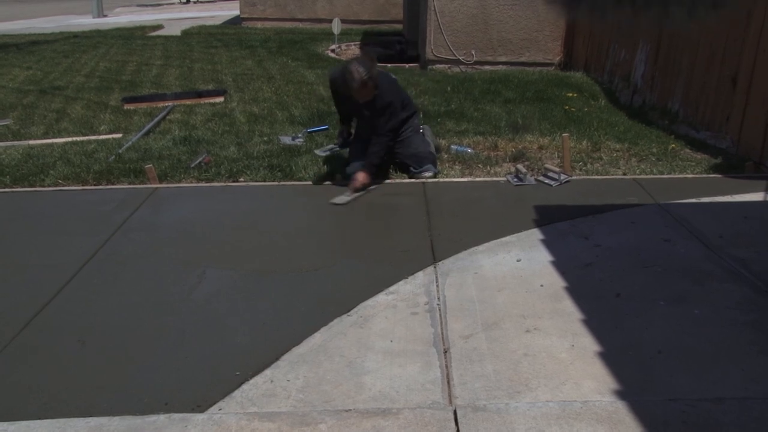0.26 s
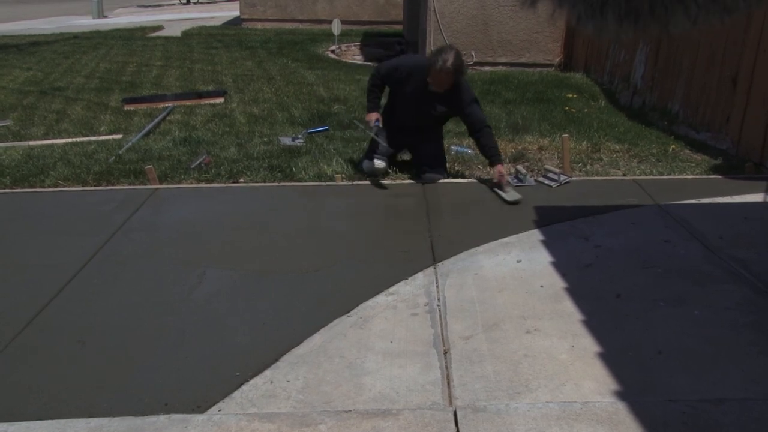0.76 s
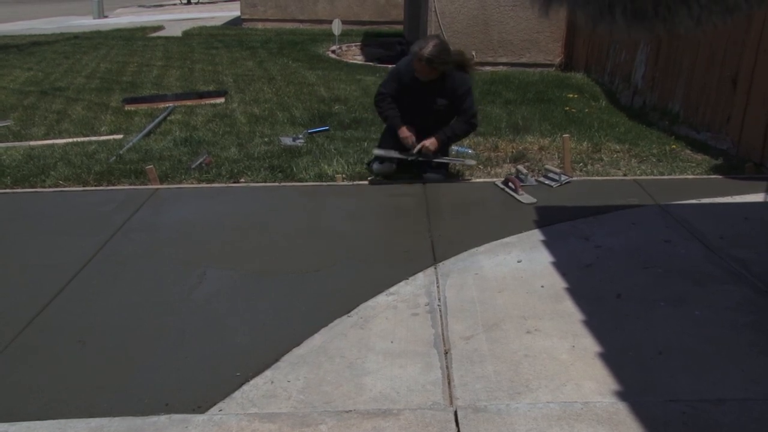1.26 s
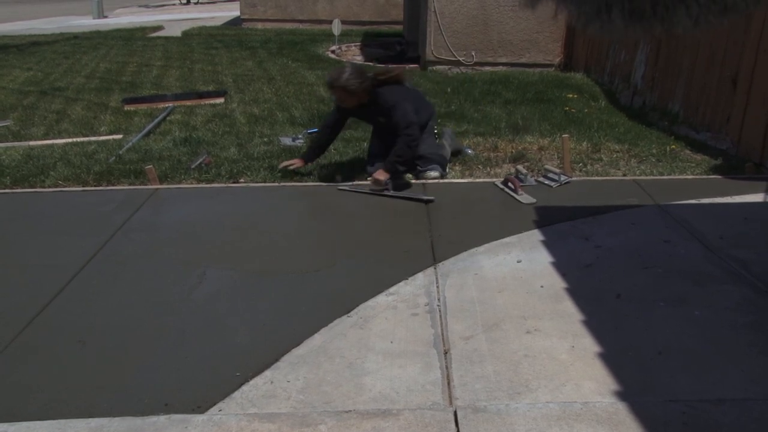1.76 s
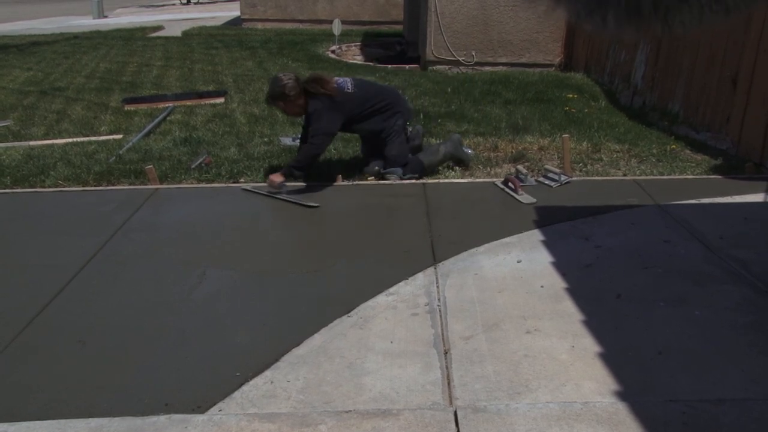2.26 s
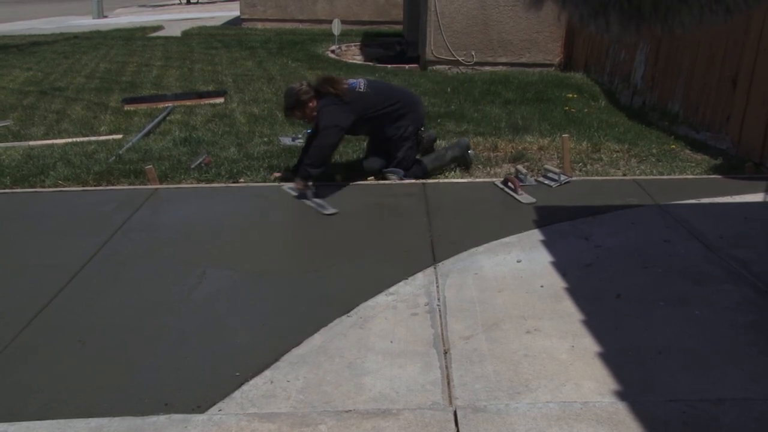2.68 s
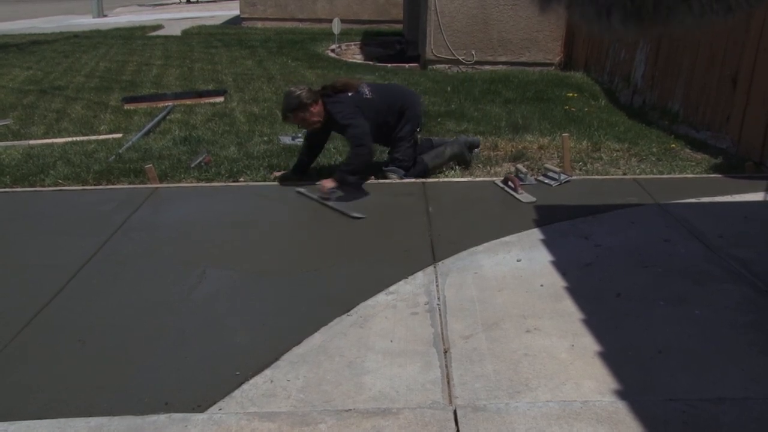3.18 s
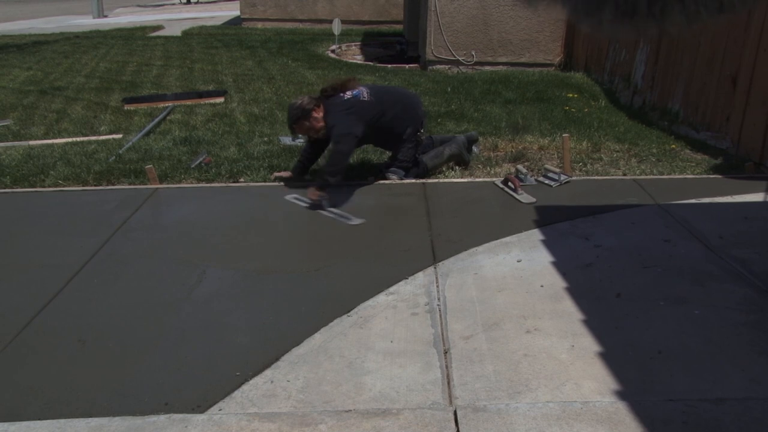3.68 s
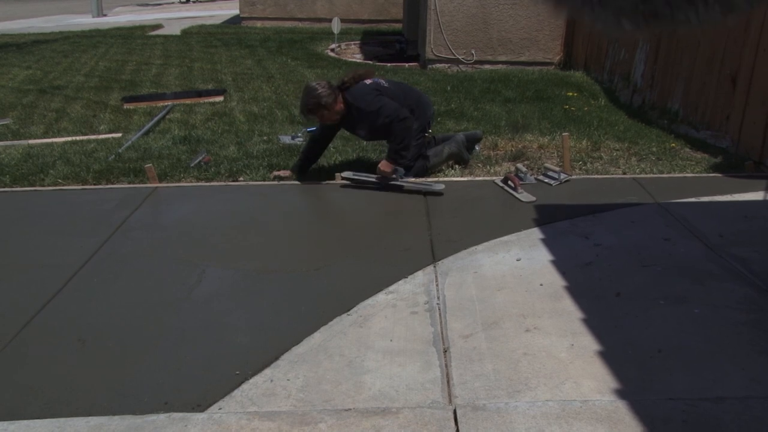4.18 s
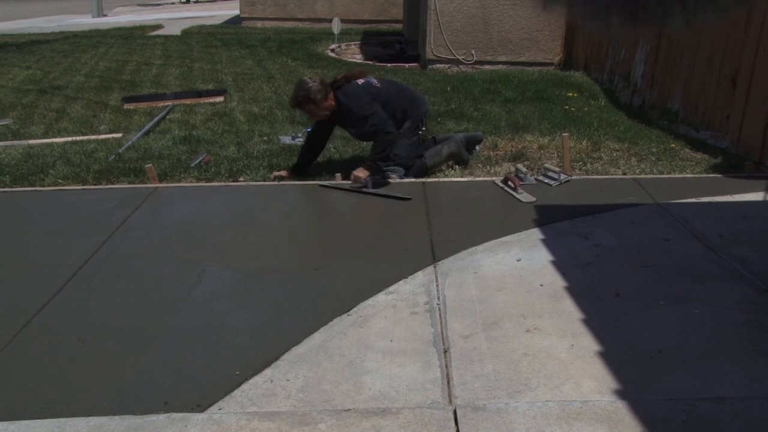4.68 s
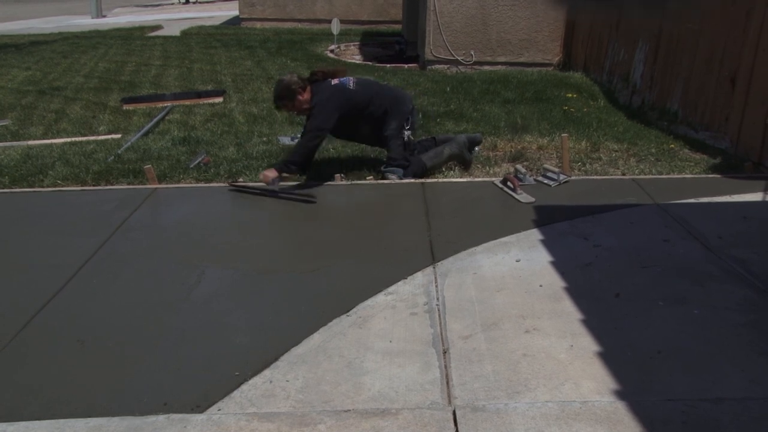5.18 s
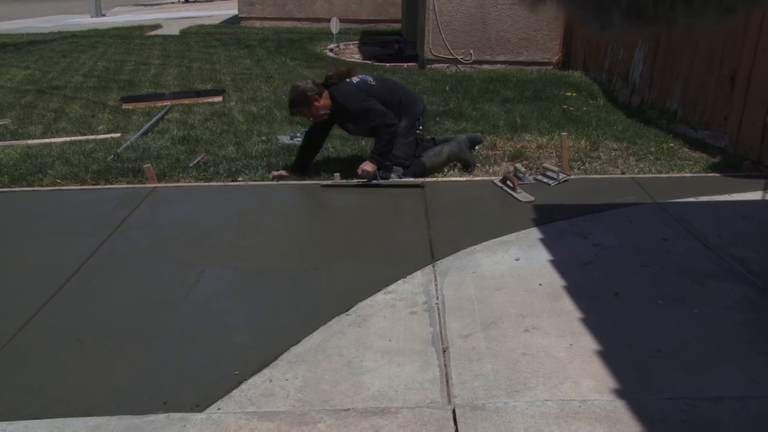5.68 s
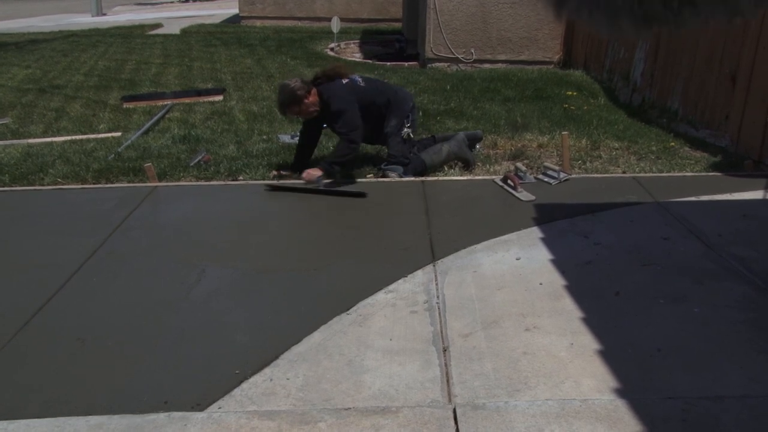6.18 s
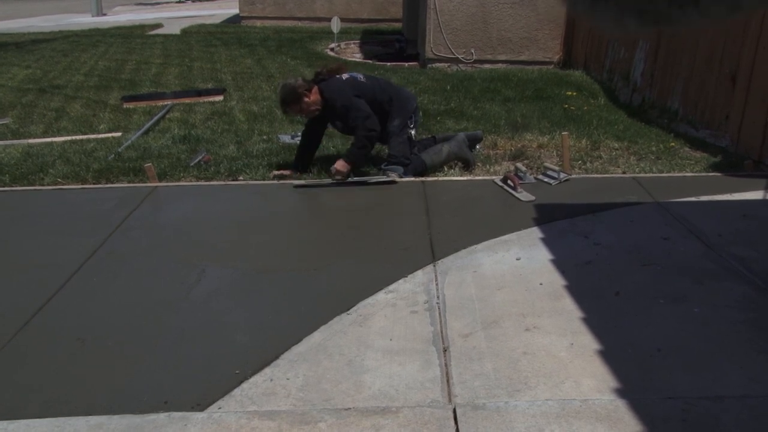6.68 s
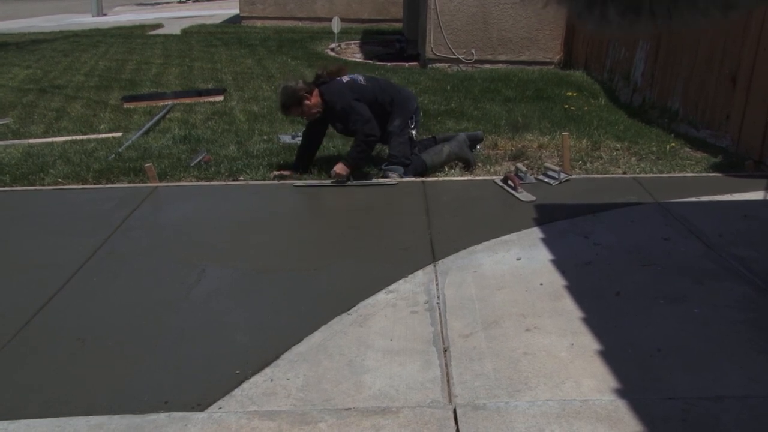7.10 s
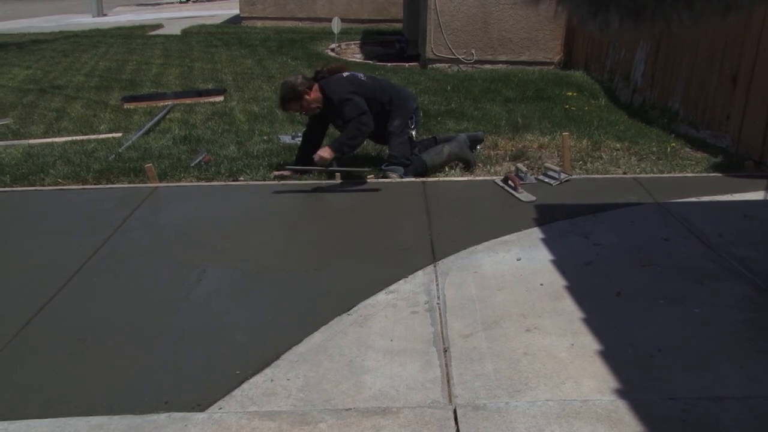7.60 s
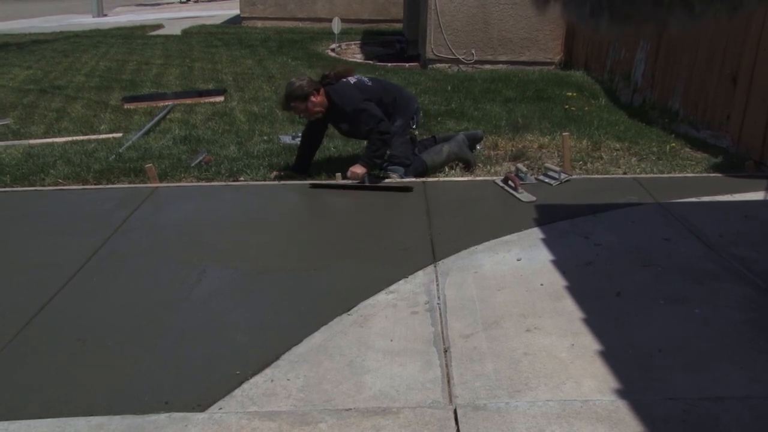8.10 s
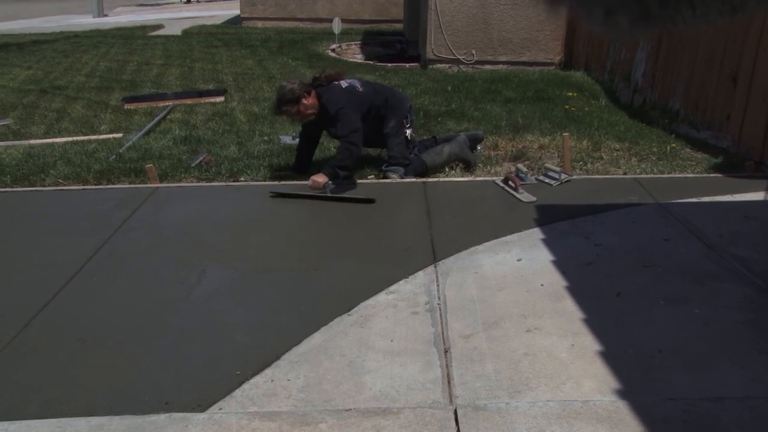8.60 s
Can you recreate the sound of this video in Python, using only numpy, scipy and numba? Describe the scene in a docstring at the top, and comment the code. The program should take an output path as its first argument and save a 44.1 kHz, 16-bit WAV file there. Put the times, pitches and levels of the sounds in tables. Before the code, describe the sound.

A steel trowel works wet concrete in an open yard, almost entirely in the left channel, over a faint low neighbourhood rumble and slight hiss. From 0 to 0.5 s two light sandy strokes rasp, the second ending in a small bite. Around 0.9 s a dull bump and gritty clicks, then near quiet until bumps and metallic taps at 1.75-1.85 s. From 1.85 to 4.1 s the strokes run on, bright and hissing, with sharp grain ticks; a low hollow knock rings briefly at 3.05 s. Another scrape spans 4.5-5.3 s beneath heavy wind thuds on the microphone, strongest near 5 s. A faint blade ring at 5.83 s starts a rougher, louder stroke until 6.35 s, with snaps and weaker gusts. A lighter scrape comes at 7.2-7.5 s, a tiny far bird whistle at 7.8 s, then two strong, growling strokes from 8.06 to 8.85 s, with a short dull outdoor tail.

```python
"""A steel trowel sweeps in short arcs over wet concrete: stick-slip of sand grains gives resonant noise.
The wet paste adds a smoother hiss, coarse grains snap, and the blade's modes ring when it is set down or lifted.
Gusts thud on the microphone as slow pressure noise with higher eddies, over a faint far rumble of filtered noise.
Dull noise bumps, one low ringing knock and a short whistle of a far bird are added; a faint tail follows the trowel.
Nearly all the sound is in the left channel."""
import sys
import numpy as np
from scipy import signal
from scipy.fft import rfft, irfft
from scipy.io import wavfile
from scipy.ndimage import uniform_filter1d
from numba import njit

SR = 44100
rng = np.random.default_rng(int(sys.argv[2]) if len(sys.argv) > 2 else 0)


def waveform_to_disk(signal):
    """Save audio, clipped to [-1, 1], as 16-bit WAV at the path in sys.argv[1]."""
    frames = np.transpose(np.atleast_2d(signal))
    scaled = np.clip(frames, -1, 1) * 32767
    samples = np.round(scaled).astype(np.int16)
    wavfile.write(sys.argv[1], SR, samples)


N = 389799
TIME = np.arange(N) / SR   # s

# spectrum of the rasp of sand: (frequency [Hz], relative density [dB per Hz])
RASP_SPECTRUM = [(400, -48.5), (1000, -27), (1700, 2.5), (2300, 1.5), (3350, 5.5), (4000, -1.5),
                 (4800, -11.5), (8000, -47.5)]
# spectrum of the growl of the edge: (frequency [Hz], relative density [dB per Hz])
GROWL_SPECTRUM = [(200, -26.5), (450, -13.5), (850, -4), (1500, 4.5), (2100, -7), (3000, -35.5)]
# spectrum of the hiss of wet paste: (frequency [Hz], relative density [dB per Hz])
HISS_SPECTRUM = [(1200, -15.5), (3800, 3.5), (5600, -0.5), (7500, 1), (8800, -1.5), (10200, -0.5),
                 (11400, -1), (13000, -7.5), (14200, -4.5), (15800, -7)]
# modes of the steel blade: (frequency [Hz], relative level [dB], decay time T60 [s])
BLADE_MODES = [(1270, -4, .15), (1730, -2, .13), (1880, -3, .15), (2220, -2, .24), (3025, -8, .2),
               (3420, -3, .17), (4170, -5, .19), (6040, -6, .14), (6420, -5, .11), (7560, -1, .08),
               (7950, -4, .09), (10420, -4, .07)]


def from_db(db):
    """Decibels are twenty times the logarithm of an amplitude ratio."""
    return 10 ** (np.asarray(db) / 20)


def rms_one(x):
    """Normalization: a signal divided by its effective value has unit mean power."""
    return x / np.sqrt(np.mean(x ** 2) + 1e-20)


def level(rows):
    """Amplitude envelope, linear in decibels between points (time [s], level [dB]); near silence outside."""
    rows = np.array(rows)
    return from_db(np.interp(TIME, rows[:, 0], rows[:, 1], left=-200, right=-200))


def drift(rate_hz):
    """Low-pass noise: a smooth random fluctuation at about this rate, with rms 1."""
    hz = np.arange(N // 2 + 1) * SR / N
    spectrum = rfft(rng.standard_normal(N)) / (1 + (hz / rate_hz) ** 2)
    return rms_one(irfft(spectrum, N))


def ramp(share):
    """Quarter-sine rise from 0 to 1 as the share goes from 0 to 1."""
    return np.sin(np.pi / 2 * np.clip(share, 0, 1))


def colour(x, spectrum, size=4096):
    """Minimum-phase filtering: a causal response of this spectrum that keeps the power of white noise."""
    hz, db = np.transpose(spectrum)
    grid = np.arange(size // 2 + 1) * SR / size + 1
    gain = from_db(np.interp(np.log(grid), np.log(hz), db))
    gain /= np.maximum(grid / hz[-1], 1) ** 2   # falls off above the last frequency
    # a folded cepstrum gives the minimum phase
    cepstrum = irfft(np.log(gain))
    cepstrum[1:size // 2] *= 2
    cepstrum[size // 2 + 1:] = 0
    response = irfft(np.exp(rfft(cepstrum)))
    return signal.oaconvolve(x, response / np.linalg.norm(response))[:N]


def bursts(events, t60, axis=1):
    """Exponential decay of noise from each event; axis picks the column of levels in dB."""
    onsets = np.zeros(N)
    for row in events:
        onsets[int(row[0] * SR)] = from_db(row[axis])
    envelope = signal.lfilter([1], [1, -from_db(-60 / (t60 * SR))], onsets + 1e-18)
    return envelope * rng.standard_normal(N)


def ring(force, hz, t60):
    """Damped oscillator: a unit impulse starts one decaying sine of height 1."""
    r, w = from_db(-60 / (t60 * SR)), 2 * np.pi * hz / SR
    return signal.lfilter([0, np.sin(w)], [1, -2 * r * np.cos(w), r * r], force + 1e-18)


@njit
def sweep(x, angle, damping):
    """State-variable band-pass whose centre (radians per sample) moves, with unit gain at resonance."""
    out, band, low = np.zeros(len(x)), 0., 0.
    for i in range(len(x)):
        g = np.tan(angle[i] / 2)
        v = (band + g * (x[i] - low)) / (1 + g * (g + damping))
        band, low = 2 * v - band, low + 2 * g * v
        out[i] = damping * v
    return out


def tuned(x, centre_hz, q, boost_db):
    """Resonance emphasis: a moving peak stands out of a noise whose short-term power stays even."""
    out = x + from_db(boost_db) * sweep(x, 2 * np.pi * centre_hz / SR, 1 / q)
    return out / np.sqrt(uniform_filter1d(out ** 2, size=3000))


def neighbourhood():
    """Superposition of many distant sources: steady noise in which the low frequencies dominate."""
    # spectrum of the distant neighbourhood: (frequency [Hz], relative density [dB per Hz])
    ambience = [(20, -11), (100, 2.5), (180, 0), (350, -5), (700, -6), (1600, -10.5), (3200, -17),
                (5500, -24), (10500, -26), (13000, -42), (15500, -58)]
    return from_db(-60) * colour(rng.standard_normal(N), ambience)


def bird():
    """Frequency modulation: the nearly pure whistle of a far bird wavers slightly about one pitch."""
    # envelope of the note: (time [s], level [dB])
    note = [(7.765, -83), (7.8, -61.5), (7.86, -82)]
    pitch_hz = 3660 * (1 + .004 * drift(30))
    return level(note) * np.sin(2 * np.pi * np.cumsum(pitch_hz) / SR)


def knocks():
    """Impact: hands and knees shift on turf in damped noise; a hollow thing is knocked and rings in one mode."""
    # bumps on the turf: (time [s], level before filtering [dB])
    bumps = [(.868, -52), (1.802, -54), (1.822, -54.5), (2.717, -64)]
    # spectrum of a bump: (frequency [Hz], relative density [dB per Hz])
    bump_spectrum = [(80, -8), (220, -1.5), (450, -5), (800, -7.5), (1500, -9.5), (3000, -36)]
    # blow on something hollow: (time [s], level [dB])
    blows = [(3.052, -42)]
    force = np.zeros(N)
    for s, db in blows:
        force[int(s * SR)] = from_db(db)
    return colour(bursts(bumps, t60=0.16), bump_spectrum) + ring(force, hz=205, t60=0.48)


def airflow():
    """Addition of powers: gusts swell and die away on top of the breeze; returns the wind's strength."""
    # breeze on the microphone between gusts: (time [s], relative level [dB])
    breeze = [(0.0, -64.5), (0.34, -54), (1.35, -90), (3.57, -70), (3.91, -60.5), (4.31, -64.5),
              (4.73, -53.5), (4.95, -36.5), (5.19, -45), (5.83, -55.5), (6.13, -54), (7.73, -69.5),
              (8.1, -61), (8.84, -70)]
    # gusts: (start [s], length [s], relative level of buffeting [dB])
    gusts = [(0.0, 0.057, -50.5), (0.198, 0.16, -58), (0.444, 0.19, -49.5), (2.15, 0.47, -64.5),
             (3.692, 0.29, -45), (4.721, 0.24, -32), (4.909, 0.29, -27.5), (5.265, 0.16, -38),
             (5.438, .26, -50), (5.914, 0.34, -39), (6.355, .31, -42), (6.929, .14, -51.5),
             (7.127, 0.25, -46.5), (7.815, 0.3, -50)]
    peak_share = 0.43   # fraction of the length; the rise ends and the fall begins here
    power = (from_db(4) * level(breeze)) ** 2
    for start, length, db in gusts:
        now = slice(int(start * SR), int((start + length) * SR))
        way = (TIME[now] - start) / length
        swell = ramp(way / peak_share) * ramp((1 - way) / (1 - peak_share))
        power[now] += (from_db(db) * swell) ** 2
    return np.sqrt(power)


def wind():
    """Turbulence: slow buffeting; stronger gusts shed smaller, higher eddies, and the hardest thud."""
    # spectrum of the buffeting: (frequency [Hz], relative density [dB per Hz])
    buffet_spectrum = [(14, -8.5), (30, -3), (48, -5), (64, 0), (95, -3.5), (130, -4.5), (190, -17.5),
                       (280, -29.5)]
    # spectrum of the eddies: (frequency [Hz], relative density [dB per Hz])
    eddy_spectrum = [(80, -16), (160, 6.5), (240, -3.5), (340, -13.5), (460, -21), (900, -34.5)]
    # hardest puffs: (time [s], relative level [dB])
    puffs = [(4.831, -20), (4.97, -16), (5.055, -19), (5.136, -27), (5.335, -26), (6.397, -32)]
    gust = airflow()
    buffet = colour(rng.standard_normal(N), buffet_spectrum)
    buffet /= np.sqrt(uniform_filter1d(buffet ** 2, size=4000))   # leaves the slow strength to the gust
    buffet *= from_db(4.5) * gust * from_db(1.7 * drift(14.0))
    eddy_strength = gust * (gust / gust.max()) ** 0.071   # grows slightly faster than the gust
    eddies = rng.standard_normal(N) * from_db(4.6 * drift(14)) * eddy_strength
    # each puff breaks up into eddies
    eddies = from_db(-6) * eddies + from_db(-4.0) * bursts(puffs, t60=0.087)
    out = buffet + colour(eddies, eddy_spectrum)
    for s, db in puffs:
        age = (TIME - s) / 0.0024
        out += from_db(db + 3) * age * np.exp((1 - age ** 2) / 2)   # one swing of pressure
    return out


def yard(x, tail_db, t60):
    """Diffuse reflection: fence and house wall scatter a faint, dull, exponentially decaying tail."""
    age = TIME[:SR // 2]
    response = rng.standard_normal(len(age)) * from_db(-60 * age / t60)
    response *= from_db(tail_db) / np.linalg.norm(response)
    tail = signal.fftconvolve(x, response)[:N]
    return signal.sosfilt(signal.butter(2, 4500, fs=SR, output="sos"), tail)


def blade(force):
    """Modal superposition: the force excites every mode of the steel."""
    return sum(from_db(db) * ring(force, hz, t60) for hz, db, t60 in BLADE_MODES)


def touches():
    """Modal excitation by contact: grit and a high click, then faint modes near the ring centre."""
    # the blade touches down or lifts off; the spot of contact picks the modes:
    # (time [s], relative contact level [dB], relative click level [dB], relative ring level [dB],
    #  ring centre [Hz])
    contacts = [(.869, -46, -56, -57, 3000), (.884, -53, -64, -62, 1800), (.917, -52, -50, -54, 3400),
                (1.756, -57, -49, -47, 2700), (1.853, -50, -49, -56, 3300), (4.505, -57, -58, -52, 3300),
                (4.554, -48, -50, -51, 3300), (5.5, -60, -51, -51, 7000), (5.535, -67, -62, -50, 3500),
                (5.83, -52, -52, -42, 1300), (7.071, -55, -58, -60, 1700), (7.524, -54, -53, -44, 2700),
                (8.055, -57, -58, -60, 3400)]
    out = from_db(0.2) * colour(bursts(contacts, t60=0.038), RASP_SPECTRUM)
    out += from_db(1.5) * colour(bursts(contacts, t60=0.11, axis=2), HISS_SPECTRUM)
    s, contact_db, click_db, ring_db, centre_hz = np.transpose(contacts)
    for hz, db, t60 in BLADE_MODES:
        octaves_away = np.abs(np.log2(hz / centre_hz))
        force = np.zeros(N)
        force[(s * SR).astype(int)] = from_db(ring_db + db - 12 * octaves_away)
        out += from_db(-3) * ring(force, hz, t60)
    return out


def snaps():
    """Brittle fracture: a coarse grain cracks free under the edge with a sharp, rapidly damped tick."""
    # coarse grains: (time [s], relative level [dB])
    cracks = [(.174, -38), (2.073, -27), (2.173, -34), (2.32, -33), (2.8, -32), (2.875, -28), (3.16, -28),
              (3.24, -28), (3.473, -41), (3.766, -35), (4.736, -29), (4.838, -29), (4.984, -25),
              (6.045, -22), (6.089, -21)]
    crack = bursts(cracks, t60=.017)
    out = from_db(-1) * colour(crack, RASP_SPECTRUM)
    out += from_db(-5.5) * colour(crack, HISS_SPECTRUM)
    return out + from_db(-16.0) * colour(crack, GROWL_SPECTRUM)


def grains(per_s, spread_db):
    """Poisson-like shot noise: random clicks of sand, many small and a few large, with rms 1."""
    sizes = from_db(spread_db * np.minimum(rng.exponential(1, N), 4.5))
    signs = rng.choice([-1, 1], N)
    return rms_one(sizes * signs * (rng.random(N) < per_s / SR))


def bite():
    """Friction grows with load: the wrist rolls and the edge digs in, given as dB of rasp."""
    # digs, hardest where a stroke turns: (time [s], half width [s], rise of the rasp [dB])
    digs = [(0.456, 0.035, 5), (1.957, 0.022, 3.5), (2.179, .045, 2), (2.335, 0.056, 1), (2.675, 0.022, 3),
            (3.19, 0.038, 3), (3.408, 0.021, 1.7), (4.068, 0.056, 6), (5.21, 0.045, 4.5), (7.443, 0.035, 8),
            (8.22, 0.015, 2.5)]
    return sum(db * np.exp(-((TIME - s) / width) ** 2) for s, width, db in digs)


def hand(dig_db):
    """Contact mechanics: bedding, dragging and lifting set the gains, and the blade's tilt the centres."""
    # strokes of the trowel: (start [s], length [s], contact on landing [0-1], attack [s], release [s],
    #  relative level of rasp [dB], of growl [dB], swell of both through the stroke [dB],
    #  relative level of hiss [dB], swell of hiss [dB],
    #  nominal rasp centre at the start [Hz], at the end [Hz], hiss centre [Hz])
    stroke_rows = [ (0.0, 0.13, 1, .01, 0.15, -56.5, -62.5, 3, -60, -10, 2720, 2400, 4550),
                   (.11, 0.4, 0.25, 0.13, .022, -54.5, -67.5, -4, -55.5, 6, 1800, 2500, 4760),
                   (1.85, .6, 0.78, 0.051, 0.093, -50, -75.5, 5, -50.5, -2.5, 2100, 2650, 9100),
                   (2.475, 0.3, 0.07, 0.26, .119, -56.5, -87, 18, -56.5, -1.5, 4000, 3920, 11000),
                   (2.735, 0.33, 0.19, .14, 0.17, -47.5, -70, -2, -49.5, -2, 3450, 3340, 8500),
                   (3.025, 0.52, 0.06, 0.27, 0.15, -43, -63.5, -19.5, -50.5, -14, 2520, 2950, 11000),
                   (3.49, 0.64, 0.01, 0.45, 0.028, -50.5, -67.5, -3.5, -54, -7.5, 3600, 1900, 10400),
                   (4.525, 0.752, 0.1, 0.15, .055, -45.2, -61.5, -5, -50, -2.5, 1670, 2390, 9400),
                   (5.827, 0.525, 0.44, 0.25, 0.066, -40.5, -45, 1.5, -44.5, -8.5, 1450, 2500, 9200),
                   (7.17, 0.37, 0.03, 0.14, 0.016, -52, -69, -7, -52, -5.5, 1630, 2180, 9000),
                   (8.022, 0.053, .3, 0.041, 0.012, -59, -64, 5, -60, 1, 1700, 1700, 10000),
                   (8.06, 0.27, 0.02, 0.19, 0.13, -38, -42, 5.5, -42, 5, 1660, 1670, 9100),
                   (8.315, 0.53, 0.02, 0.093, 0.01, -41, -47, 1, -45, -0.5, 1540, 2500, 8700), ]
    # as the blade beds in, the paste hisses first and the edge growls last: powers of the contact
    hiss_power, rasp_power, growl_power = 1.57, 2.5, 2.7
    arc_db = 3   # the hiss follows the speed of the hand: this much fainter at the ends of the arc
    dig_growl, dig_hiss = 2.53, 1.34   # dB of growl and of hiss for each dB of rasp
    dig_sag_octaves = .03   # a deeper bite lowers the rasp: octaves for each dB of bite
    rasp, growl, hiss = np.zeros((3, N))
    rasp_centre = np.full(N, float(stroke_rows[0][-3]))
    hiss_centre = np.full(N, float(stroke_rows[0][-1]))
    for (start, length, landing, attack, release, rasp_db, growl_db, swell_db,
         hiss_db, hiss_swell_db, start_hz, end_hz, hiss_hz) in stroke_rows:
        now = slice(int(start * SR), int((start + length) * SR))
        age = TIME[now] - start
        way = age / length
        contact = landing + (1 - landing) * ramp(age / attack)
        contact *= ramp((length - age) / release)
        swell = swell_db * (way - .5)
        hiss_swell = hiss_swell_db * (way - .5) + arc_db * (np.sin(np.pi * way) - 1)
        rasp[now] += contact ** rasp_power * from_db(rasp_db + swell)
        growl[now] += contact ** growl_power * from_db(growl_db + swell)
        hiss[now] += contact ** hiss_power * from_db(hiss_db + hiss_swell)
        rasp_centre[now] = start_hz * (end_hz / start_hz) ** way
        hiss_centre[now] = hiss_hz
    rasp *= from_db(dig_db)
    growl *= from_db(dig_growl * dig_db)
    hiss *= from_db(dig_hiss * dig_db)
    return rasp, growl, hiss, rasp_centre * 2 ** (-dig_sag_octaves * dig_db), hiss_centre


def strokes():
    """Stick-slip friction: sand catches and slips under the blade; fine paste adds a smoother hiss."""
    dig_db = bite()
    rasp, growl, hiss, rasp_hz, hiss_hz = hand(dig_db)
    # the line of contact wanders along the blade and detunes the rasp (octaves, rate in Hz)
    rocking = 2 ** (.11 * drift(13))
    judder = from_db(1.22 * drift(54))   # the hand's pressure is never even
    sand = rms_one(grains(per_s=5000, spread_db=2.0) * judder)
    paste = rms_one((sand + from_db(11.0) * rng.standard_normal(N)) * judder)
    focus_db = 0.6 * dig_db   # a deeper bite sharpens both resonances
    rasp_noise = tuned(colour(sand, RASP_SPECTRUM), rasp_hz * rocking, q=2.9, boost_db=10.5 + focus_db)
    hiss_noise = tuned(colour(paste, HISS_SPECTRUM), hiss_hz, q=1.64, boost_db=5 + focus_db)
    out = from_db(5.5) * rasp * rasp_noise
    out += from_db(6.0) * hiss * hiss_noise
    out += from_db(8.0) * growl * colour(sand, GROWL_SPECTRUM)
    return out + from_db(-43.5) * blade(sand * rasp)


def scene():
    """Linear superposition of trowel, yard and wind; the right channel is a very faint copy."""
    far = neighbourhood() + bird()
    trowel = strokes() + snaps() + touches()
    sound = trowel + yard(trowel, tail_db=-15, t60=0.34) + knocks() + wind() + far
    return np.array([sound, from_db(-74) * sound])


def record(dry):
    """Band limiting: faint electronic hiss joins both channels, then an elliptic low-pass cuts the top."""
    # (frequency [Hz], relative density [dB per Hz])
    hiss_spectrum = [(100, 0.0), (11000, -1), (14000, -9.5)]
    noise = np.array([colour(rng.standard_normal(N), hiss_spectrum) for channel in dry])
    low_pass = signal.ellip(14, .1, 80, 15700, fs=SR, output="sos")
    return signal.sosfilt(low_pass, dry + from_db(-86.5) * noise)


dry = scene()
out = record(dry)
waveform_to_disk(out)
```